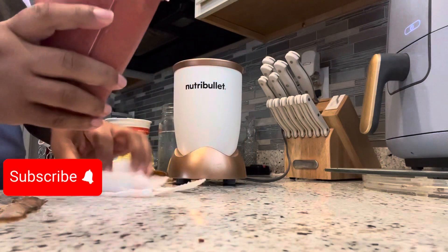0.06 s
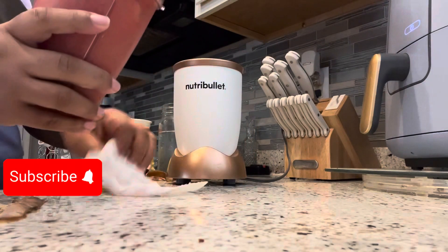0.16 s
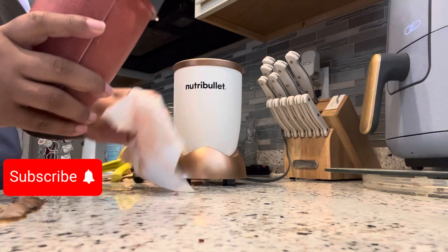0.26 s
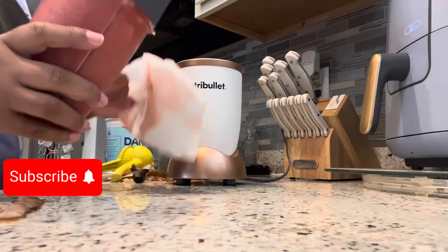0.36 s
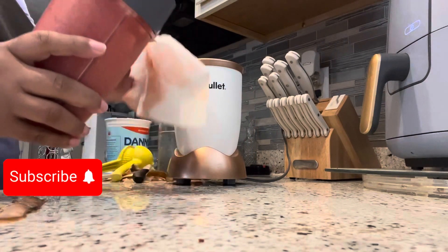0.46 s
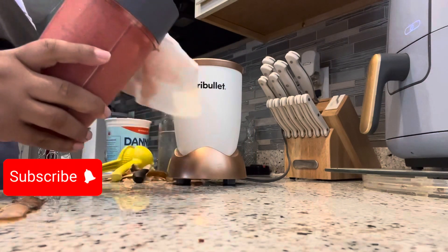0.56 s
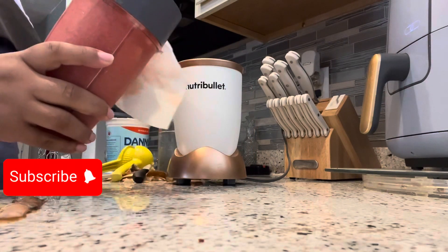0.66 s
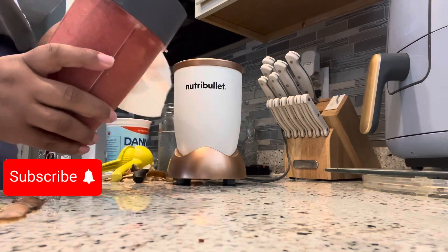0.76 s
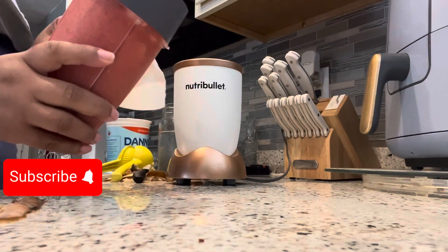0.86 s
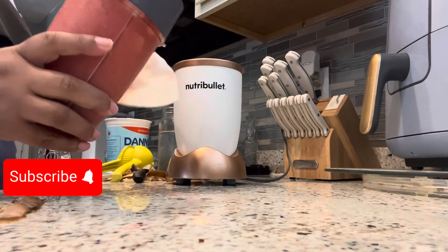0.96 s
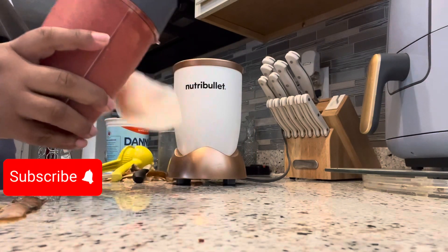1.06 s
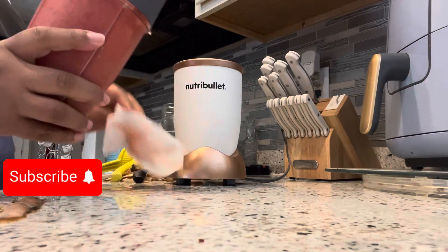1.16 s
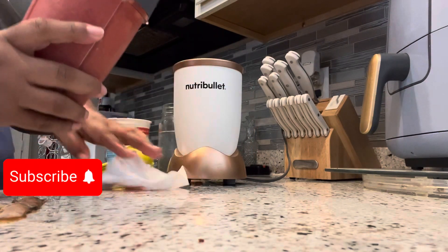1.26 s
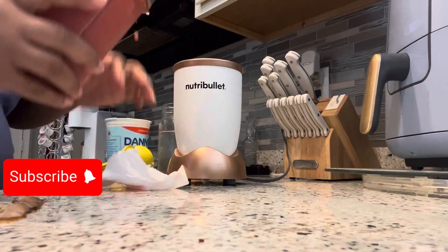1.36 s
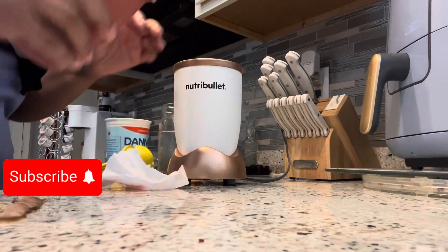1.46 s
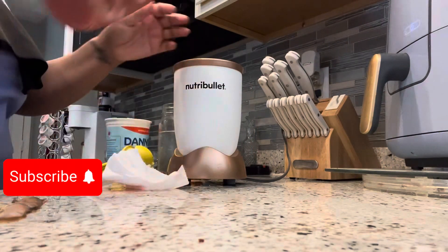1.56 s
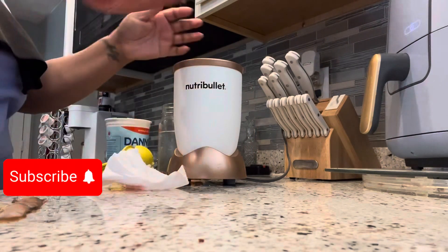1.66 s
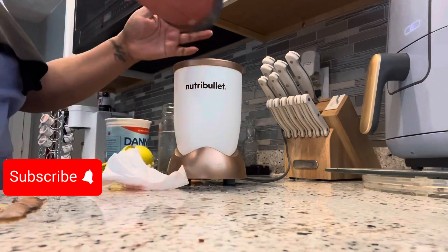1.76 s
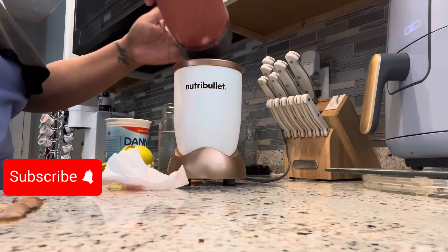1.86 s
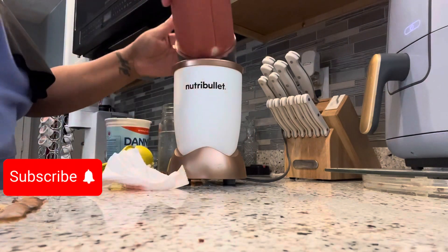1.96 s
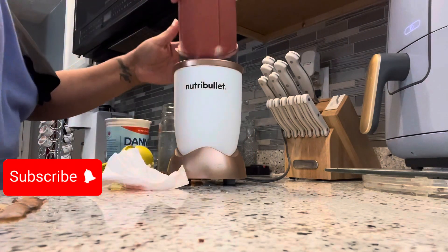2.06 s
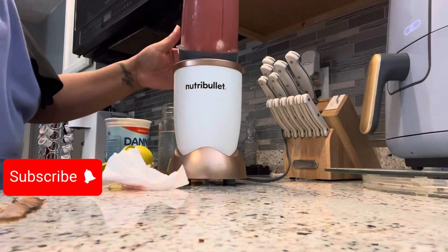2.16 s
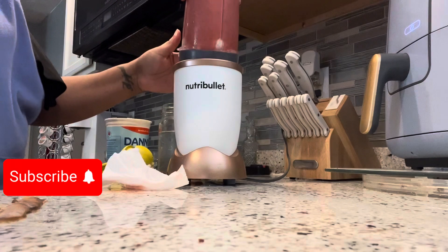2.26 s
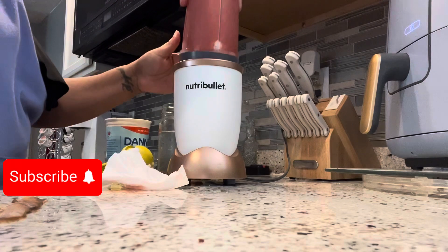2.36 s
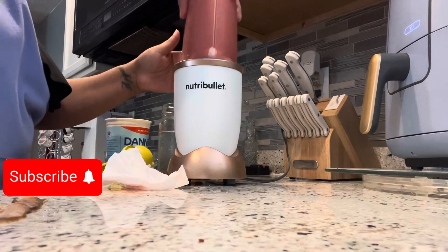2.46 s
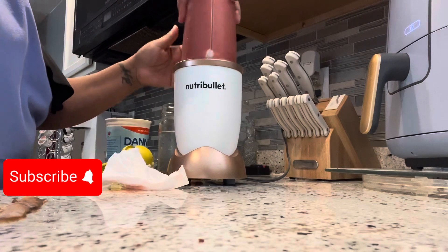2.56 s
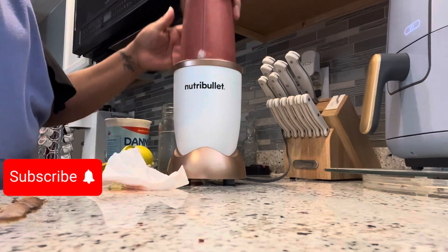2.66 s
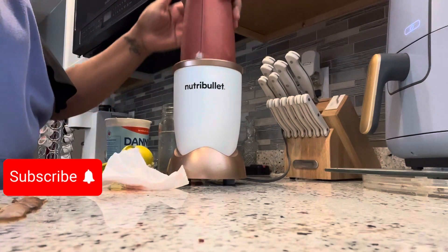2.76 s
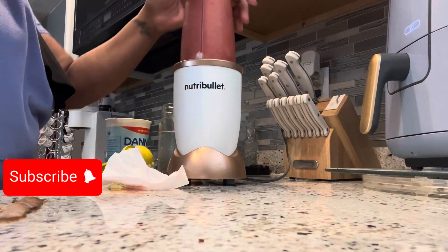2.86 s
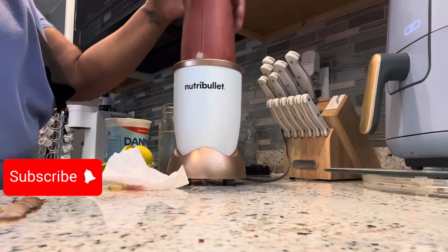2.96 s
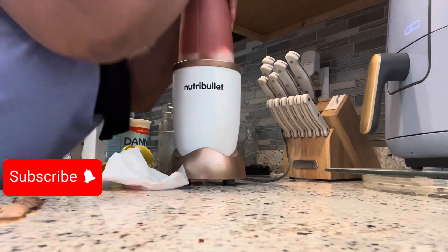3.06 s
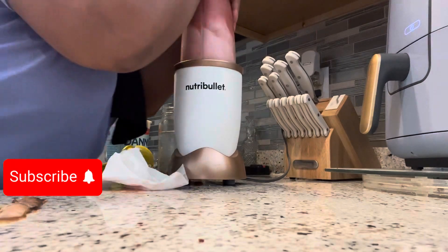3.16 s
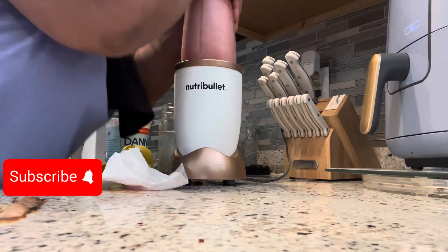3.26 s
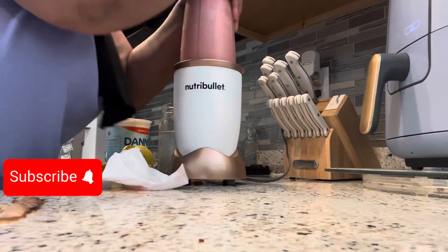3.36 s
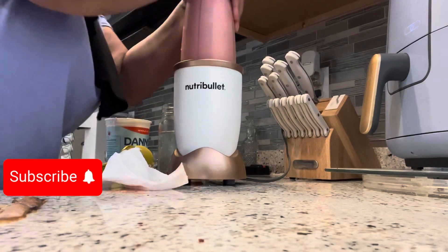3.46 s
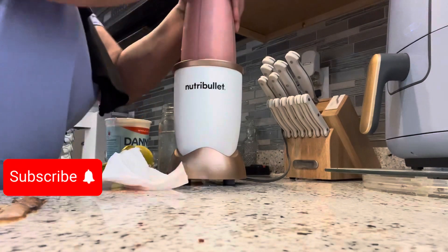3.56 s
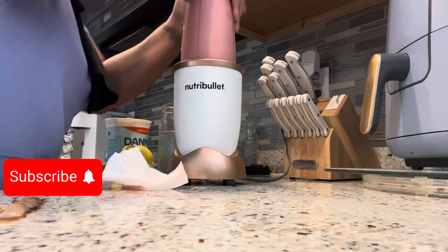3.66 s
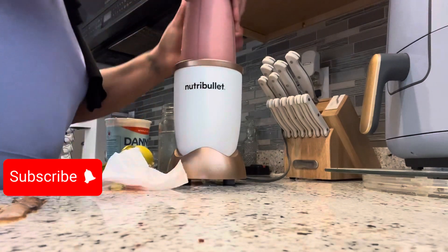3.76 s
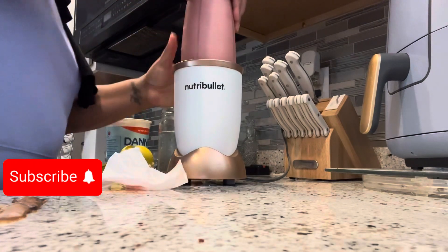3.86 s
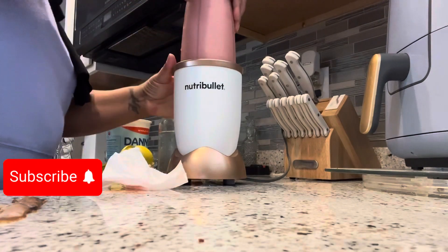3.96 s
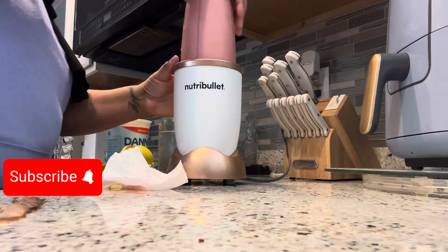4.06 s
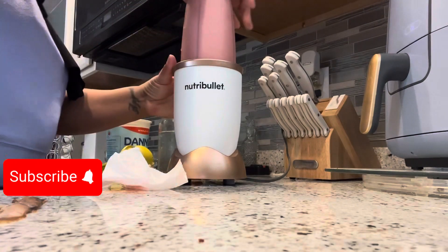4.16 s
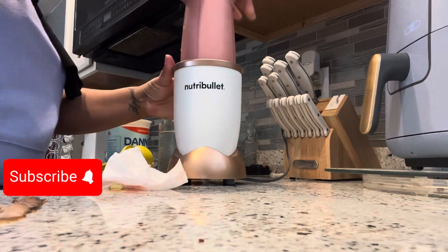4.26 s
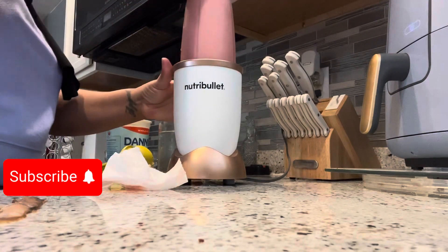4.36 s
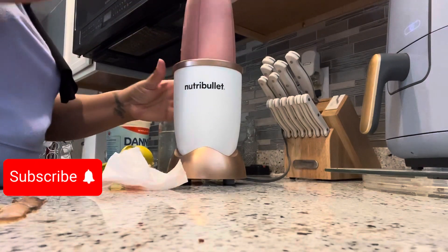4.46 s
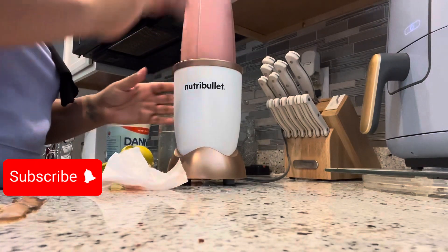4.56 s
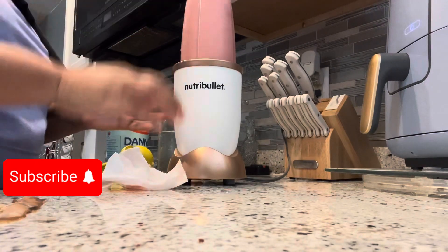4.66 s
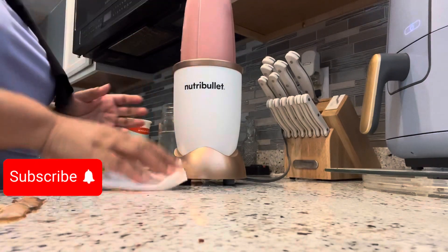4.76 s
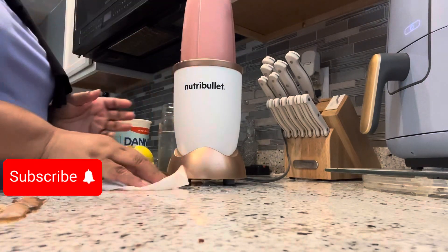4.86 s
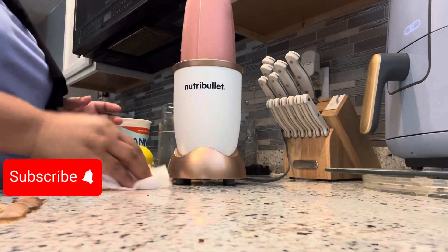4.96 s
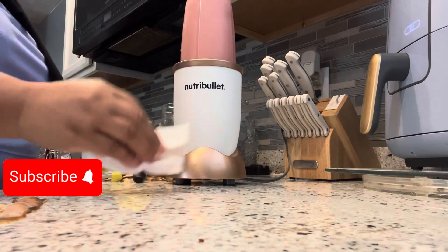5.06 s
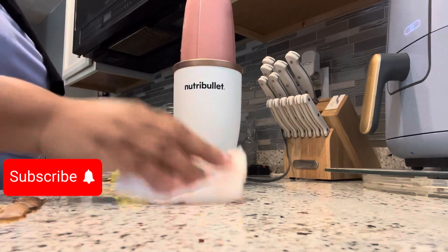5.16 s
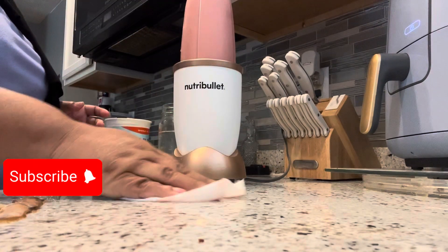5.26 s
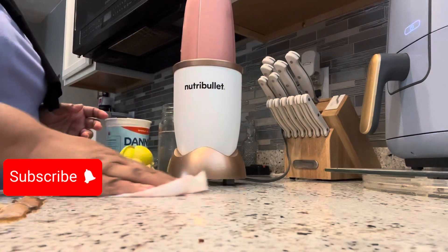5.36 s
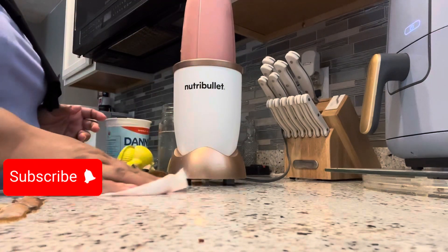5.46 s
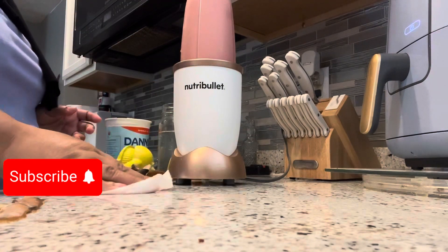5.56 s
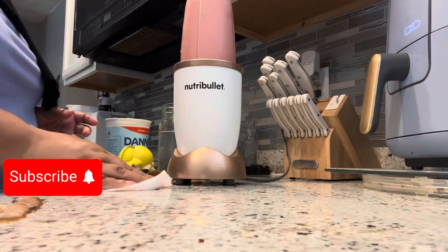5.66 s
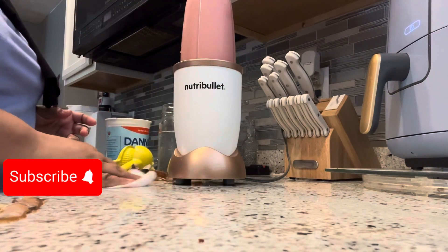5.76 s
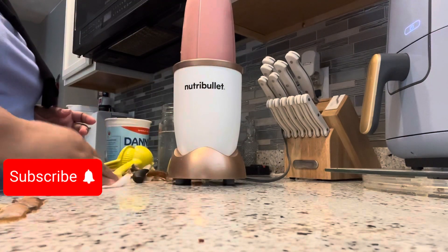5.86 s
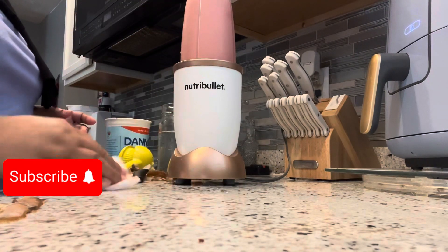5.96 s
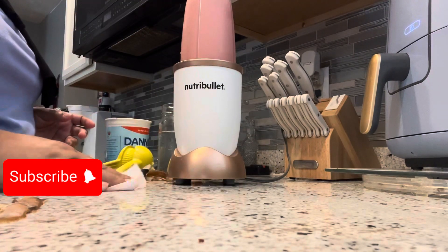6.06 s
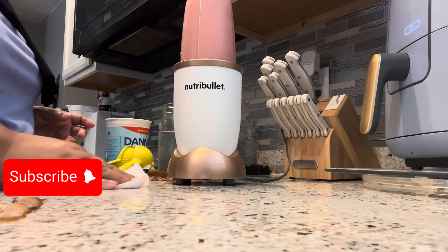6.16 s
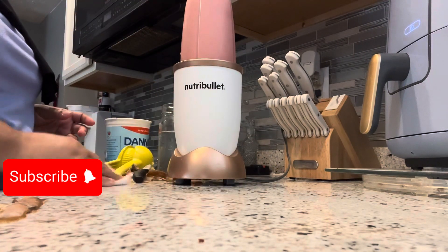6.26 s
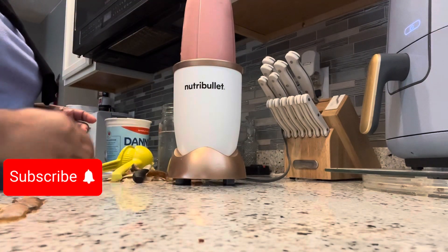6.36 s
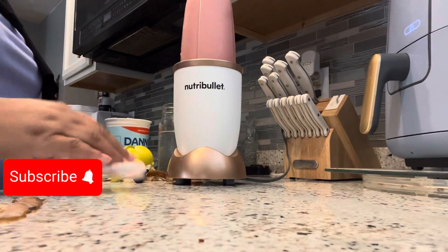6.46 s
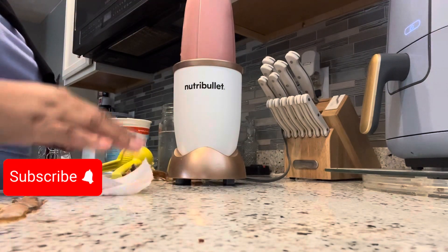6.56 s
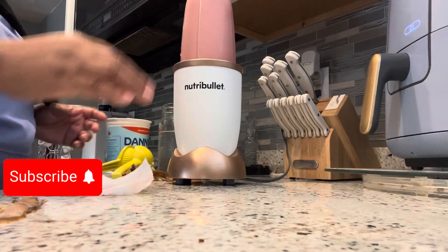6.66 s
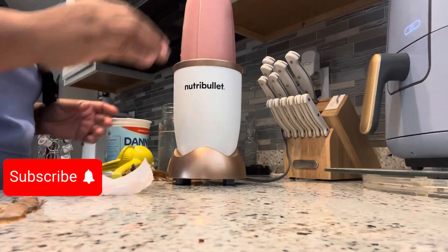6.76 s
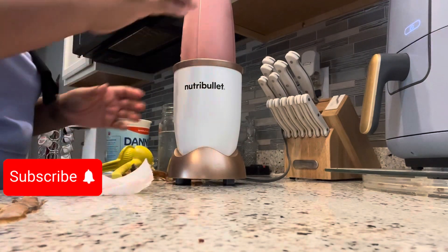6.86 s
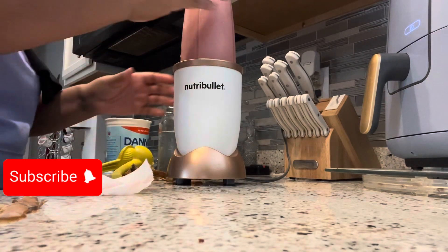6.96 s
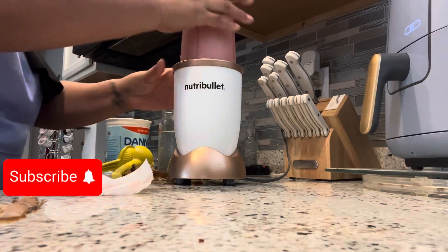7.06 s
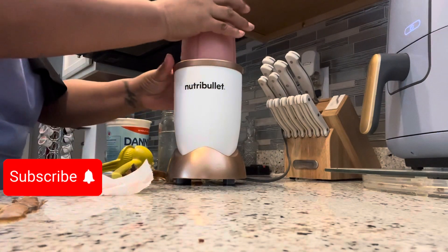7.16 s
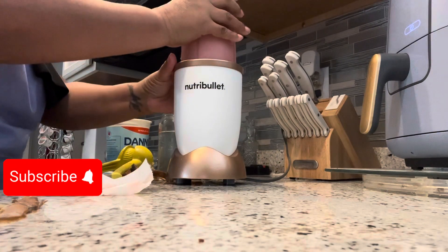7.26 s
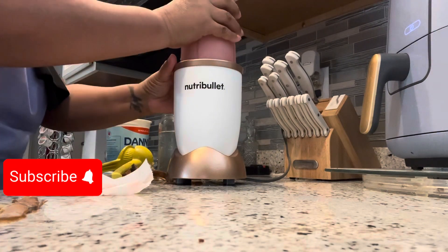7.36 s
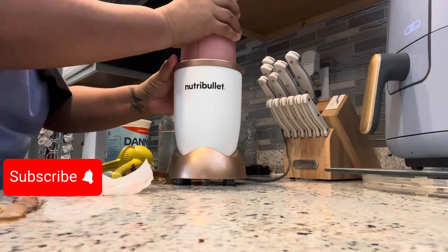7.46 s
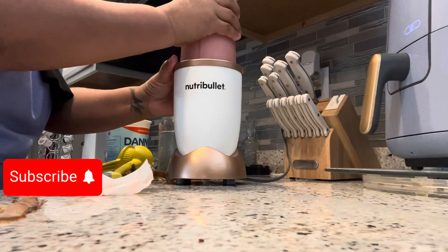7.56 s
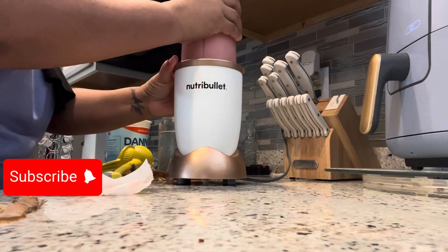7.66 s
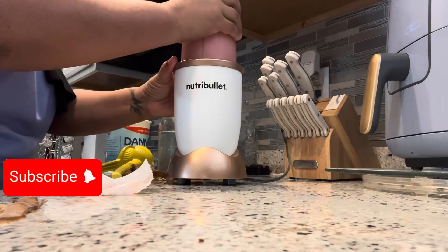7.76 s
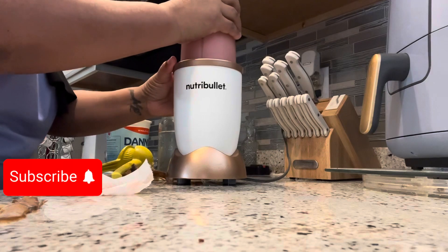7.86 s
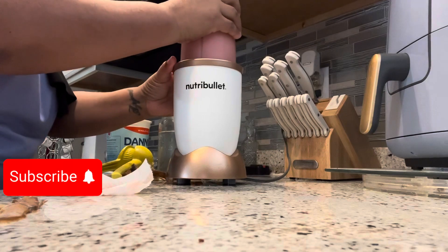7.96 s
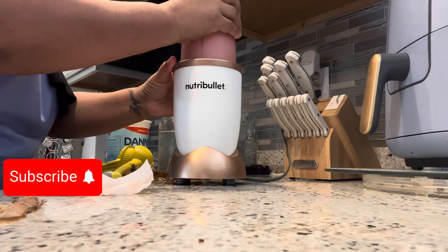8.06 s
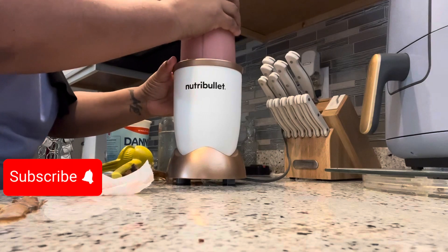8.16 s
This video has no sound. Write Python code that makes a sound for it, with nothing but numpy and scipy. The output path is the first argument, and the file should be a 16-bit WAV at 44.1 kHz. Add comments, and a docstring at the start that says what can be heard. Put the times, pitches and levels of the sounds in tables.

```python
"""A small blender churns fruit on a stone kitchen counter, close to a two-port microphone on the same counter.
Shaped noise makes the liquid, random hits on decaying sines the fruit in the cup, wavering sines the motor.
Before that, paper rustles and the cup is knocked into the base: struck modes and short noise bursts.
A fridge hums on wavering sines behind it all, over a bed of room air.
The recorder lifts the quiet opening and drops that lift for good once the motor is loud."""
import sys
import numpy as np
from scipy import signal
from scipy.fft import rfft, irfft, next_fast_len
from scipy.io import wavfile
from scipy.ndimage import uniform_filter1d, minimum_filter1d

SR = 44100
rng = np.random.default_rng(int(sys.argv[2]) if len(sys.argv) > 2 else 0)


def digitize_waveform(pressure):
    """Quantize a signal to 16-bit integers and store it at the path in sys.argv[1].

    Rows of a 2-D input are taken as channels; values are limited to [-1, 1].
    """
    field = np.atleast_2d(pressure).T
    bounded = np.clip(field, -1, 1)
    quanta = np.round(bounded * 32767).astype(np.int16)
    wavfile.write(sys.argv[1], SR, quanta)


N = 362943

# Levels in the tables are those ahead of the trims, port response and recorder gain that follow.
# whipped liquid, smooth spectrum: [f/Hz, level per Hz/dB]
LIQUID = [(60, -50), (150, -26), (300, -13), (700, 1), (1050, 7), (1350, -2.5), (1750, 1), (2600, -5),
          (2950, -3.5), (3400, -5), (3800, -7.5), (4300, -11), (5500, -20), (7000, -28)]
# ringing modes of the cup, lower part to neck: [f/Hz, level/dB, t60/s]
CUP_MODES = [(108.5, -22.5, 0.096), (176, -19, 0.049), (272, -8, 0.029), (380.3, 0.5, 0.063),
             (424.2, 6, 0.051), (461.2, 3, 0.054), (521.7, -8.5, 0.078), (579.7, -5.5, 0.085)]
# large pieces strike the cup: [loudest at t/s, belly peak level/dB, neck peak level/dB]
STRIKES = [(3.036, -32, -40.5), (3.063, -23.5, -37), (3.085, -38, -48), (3.104, -33, -52),
           (3.116, -27, -53), (3.128, -17.5, -48), (3.145, -24, -40), (3.168, -18.5, -32),
           (3.185, -25, -28), (3.205, -24, -23.5), (3.225, -16, -30), (3.244, -12.5, -25),
           (3.26, -9.5, -25), (3.28, -11, -21), (3.293, -8, -15), (3.312, -12, -32), (3.344, -12, -38),
           (3.397, -9, -29), (3.412, -6.5, -24), (3.435, -11, -29), (3.454, -11, -28), (3.48, -11, -36),
           (3.506, -15.5, -39), (3.559, -11, -31), (3.577, -11, -44), (3.618, -13, -30), (3.644, -21, -36),
           (3.657, -13.5, -36), (3.688, -15, -30), (3.732, -10.5, -31), (3.787, -14, -29),
           (3.834, -13, -36), (3.913, -10.5, -29), (3.963, -23, -20), (3.979, -10.5, -36),
           (4.013, -19, -31), (4.08, -14.5, -15), (4.11, -16, -38), (4.157, -16, -34), (4.185, -17, -26),
           (4.208, -9, -27), (4.277, -16.5, -18.5), (4.324, -16.5, -34), (4.355, -14, -42),
           (4.402, -22, -19.5), (4.511, -16, -12.5), (4.6, -21, -22), (4.66, -18, -15.5),
           (4.69, -14.5, -21), (4.722, -14.5, -36), (4.748, -19.5, -27), (4.807, -15, -16),
           (4.845, -15, -17), (4.874, -14, -18), (4.947, -12, -17.5), (4.968, -14.5, -24),
           (5.034, -20.5, -16), (5.084, -12, -44), (5.111, -16, -39), (5.206, -25, -16.5), (5.45, -41, -31),
           (5.775, -12, -17), (6.12, -12, -16.5), (6.372, -13.5, -31), (6.459, -41, -13.5),
           (6.684, -19, -24), (6.724, -30, -13.5), (7.363, -23, -20), (7.464, -16.5, -30),
           (8.045, -42, -44), (8.07, -47, -46), (8.11, -34, -40), (8.145, -44, -52), (8.173, -36.5, -53),
           (8.196, -46, -58), (8.212, -46, -63)]

# switched on; blade runs free; a hand grips the cup; switched off
ON_S, FREE_S, PRESS_S, OFF_S = 3.0, 5.19, 7.58, 8.0
MAINS_HZ = 120.9  # the mains buzz and torque throb
QUIET_DB, LIFT_DB = -20, 20  # level of the small sounds; what the recorder adds to them


def churn():
    """Blades whip the liquid: a roar and a fizz, throbbing with the mains torque."""
    # the liquid: [t/s, churn level/dB, treble level/dB]
    blend = [(3.0, -58, -20), (3.03, -50, -10), (3.1, -46.5, -9), (3.165, -39.5, -11.5), (3.19, -41.5, -13),
             (3.33, -37.5, -12), (3.41, -31.5, -14.5), (3.6, -31.5, -10), (4.3, -33.5, -9),
             (5.2, -35, -6.5), (6.2, -31.5, -8), (7.1, -30.5, -8), (7.965, -32.5, -7), (8.0, -35.5, -11),
             (8.02, -41.5, -5.5), (8.11, -50.5, -7.5), (8.14, -58.5, -4), (8.23, -74, 7)]
    # the roar's colour moves up as the fruit thins: [t/s, level near 1, 2 and 3.5 kHz/dB]
    tint = [(3.0, -5, -4, -7.5), (3.6, 0, -2.3, -1.5), (4.0, -1.1, -0.7, -0.5), (4.5, 1.5, 0.2, 0.8),
            (5.3, 0.7, 1, 4), (5.6, 1.3, 1, 4), (6.1, 0.5, 1, 0.5), (6.9, -2, -0.8, 0),
            (7.05, -1.5, 2, 2.5), (7.6, -2, 3.5, 2), (8.0, 0, 3.5, 1.5)]
    # resonances of the cup walls: [f/Hz, width/Hz, level/dB]
    wall_peaks = [(1136, 53, -1), (1453, 76, 6), (1733, 55, 5), (2370, 81, 3), (3486, 120, 6)]
    # treble spray: [f/Hz, level per Hz/dB]
    spray = [(4000, 1.5), (5500, 0), (7000, -2.5), (9000, -12), (12000, -16.5), (13500, -33), (15000, -26)]
    level_db, treble_db = curves(blend)
    throb = 1 + 0.018 * np.sin(2 * np.pi * MAINS_HZ * np.arange(N) / SR)
    roar = noise(LIQUID, patchy_db=1.35, peaks=wall_peaks)
    bands_hz = [650, 1400], [1500, 2400], [3100, 5400]
    for db, band in zip(curves(tint), bands_hz):
        sos = signal.butter(2, band, "band", fs=SR, output="sos")
        roar = roar + (gain_of(db) - 1) * signal.sosfiltfilt(sos, roar)
    fizz = gain_of(treble_db + 1.5) * noise(spray, patchy_db=2.0)
    envelope = gain_of(level_db + 2.5 + 0.41 * wander(30)) * (after(ON_S) > 0)
    return (roar + fizz) * envelope * throb


def lumps():
    """Pieces of fruit patter on the cup, each stirring its modes by chance amounts."""
    # patter on the cup's belly: [t/s, level/dB]
    belly_rows = [(3.0, -45), (3.03, -34.5), (3.07, -36.5), (3.15, -27.5), (3.3, -19), (3.4, -22),
                  (3.9, -20.5), (4.3, -27.5), (5.1, -24.5), (5.4, -25.5), (6.6, -27), (7.6, -29.5),
                  (7.97, -35.5), (8.02, -35), (8.08, -56), (8.13, -54), (8.23, -68)]
    # base rocking: [t/s, level/dB]
    rocking = [(3.001, -46), (3.06, -46), (3.2, -40), (3.5, -35.5), (4.0, -37), (4.2, -40.5), (5.0, -49),
               (8.0, -63), (8.1, -59)]
    # the fruit gets finer: [t/s, hits per second]
    hit_rate = [(3.0, 430), (3.6, 595), (4.2, 1120), (4.998, 2000), (8.2, 2240)]
    belly_db, base_db, rate = (curves(rows)[0] for rows in (belly_rows, rocking, hit_rate))
    neck_db = -31 - 11 * (1 - ramp(ON_S, 0.54)) + 2 * wander(12)  # rises, then holds with a flutter
    neck_db = neck_db - 130 * after(OFF_S) - 6 * ramp(OFF_S, .015)  # fade in dB per s and quick drop
    chance, size = rng.random((2, 2, N))  # separate hits for each of the pair
    strength = gain_of(-2.0 * np.log(size + 0.076)) / np.sqrt(rate)
    hits = (chance < rate / SR) * strength * (after(ON_S) > 0)
    blow = np.hanning(60)  # contact lasts over a millisecond
    shares = rng.standard_normal((len(CUP_MODES), N))
    modes = []
    for share, ring in zip(shares, rings(CUP_MODES, 0.0052)):
        struck = np.convolve(ring, blow)
        modes.append(signal.oaconvolve(hits * share, struck[None])[:, :N])
    base, belly, neck = (evened(sum(part)) for part in (modes[:3], modes[3:6], modes[6:]))
    return base * gain_of(base_db) + belly * gain_of(belly_db) + neck * gain_of(neck_db)


def chunks():
    """Large pieces land softly, ring the cup's belly and neck and throw up a short splash."""
    s, *levels = np.transpose(STRIKES)
    at = np.round(s * SR).astype(int)
    trains = np.zeros((2, N))
    trains[:, at] = gain_of(levels)
    soft = rings(CUP_MODES, rise_s=0.014)
    # neighbouring modes start in opposite directions
    shapes = [-soft[2], soft[3], -soft[4], soft[5]], [soft[6], -soft[7]]
    # each piece lands on another spot and favours other modes
    spot = np.ones((2, 4, N))
    spot[..., at] = gain_of(1.5 * rng.standard_normal((len(s), 2, 4))).transpose(1, 2, 0)
    ringing = np.zeros(N)
    for train, part, gains in zip(trains, shapes, spot):
        whole = abs(sum(part))
        peak, delay = whole.max(), whole.argmax()  # the loudest moment falls on the table's time
        for ring, gain in zip(part, gains):
            ringing += signal.oaconvolve(train * gain, ring / peak)[delay:][:N]
    splash_fade = gain_of(-22.5 - 60 * np.arange(SR // 10) / SR / 0.063)  # t60 0.063 s
    splash = signal.oaconvolve(trains[0], splash_fade)[:N] * noise(LIQUID, patchy_db=6.5)
    return ringing + splash


def motor():
    """Shaft tone, overtones, commutator whine, mains buzz and sidebands; a last faint note of the cup."""
    # motor: [t/s, shaft f/Hz, shaft level/dB, mains buzz level/dB]
    run = [(3.0, 294, -56, -55), (4.0, 338.7, -30, -65), (4.2, 344, -42, -66), (4.33, 347, -39, -43),
           (4.45, 349, -34, -51), (4.6, 351.4, -30, -50), (4.8, 356, -25, -49), (4.87, 357.5, -27, -47),
           (4.98, 358, -22.5, -49.5), (5.28, 359.3, -23, -50.5), (5.42, 361.3, -18.5, -41),
           (5.58, 364.4, -24, -46), (5.66, 365, -17.5, -46), (5.9, 364.4, -18.5, -42.5),
           (6.4, 363.4, -19.5, -38), (6.8, 364.5, -18.5, -44.5), (7.05, 363.7, -19.5, -37.5),
           (7.25, 365.2, -23.5, -37.5), (7.56, 360.6, -19.5, -37.5), (7.95, 361, -19, -39.5),
           (8.0, 357, -19, -45)]
    # shaft overtones: [multiple of the shaft, level/dB]
    overtones = [(3, -44), (4, -47), (8, -48)]
    # a faint wavering note glides down as the last pieces ring the cup:
    # one row [start t/s, length/s, from f/Hz, to f/Hz, level/dB]
    glide = (8.095, .135, 440, 362, -53)
    commutator_bars = 24
    loaded_db, freeing_s = -19, 0.2  # how much lower whine and sidebands are under load; time to change
    labour_rad, labour_db = .45, 2.0  # the loaded motor runs unevenly in phase and level
    grip_s = .03
    second_db, second_gripped_db = -59, -44  # second mains overtone
    hz, shaft_db, buzz_db = curves(run)
    labour = 1 - ramp(FREE_S - freeing_s / 2, freeing_s)
    load_db = loaded_db * labour
    grip = ramp(PRESS_S - grip_s / 2, grip_s)
    shaft = 2 * np.pi * np.cumsum(hz * (1 + 0.00207 * wander(12))) / SR
    mains = 2 * np.pi * MAINS_HZ * np.arange(N) / SR

    # the gripping hand damps the shaft tone and the whine
    level = gain_of(shaft_db - 19 * grip + (1.1 + labour_db * labour) * wander(24))
    tones = level * np.sin(shaft + (.12 + labour_rad * labour) * wander(45))

    level = gain_of(-52.5 + load_db - 7 * grip + 3.5 * wander(40))
    tones += level * np.sin(commutator_bars * shaft + 1.3 * wander(200) + 0.72 * np.sin(mains))

    level = gain_of(buzz_db + (1.2 + labour_db * labour) * wander(14))
    tones += level * np.sin(mains + labour_rad * labour * wander(30))

    level = gain_of(second_db + (second_gripped_db - second_db) * grip + 2.1 * wander(20))
    tones += level * np.sin(2 * mains)

    level = gain_of(1.5 + buzz_db + load_db + 2.5 * wander(8))
    tones += level * (np.sin(shaft + mains) + 0.36 * np.sin(2 * shaft + mains))

    orders = sum(gain_of(db + 1.7 * wander(25)) * np.sin(k * shaft) for k, db in overtones)
    tones += ramp(3.9, freeing_s) * orders  # overtones come up from 3.9 s

    start, length, from_hz, to_hz, db = glide
    u = ramp(start, length)
    swell = gain_of(db) * np.sqrt(abs(np.sin(np.pi * u)))
    glide_hz = from_hz + (to_hz - from_hz) * u + 22 * wander(80)  # wavers in pitch
    ring_glide = swell * gain_of(5 * wander(200)) * np.sin(2 * np.pi * np.cumsum(glide_hz) / SR)
    powered = gain_of(-500 * after(OFF_S)) * (after(ON_S) > 0)  # dies at 500 dB per s
    return np.sqrt(2) * (tones * powered + ring_glide)


def knocks():
    """Cup meets base: each knock rings the cup, thuds the base, clacks and ticks with decaying noise."""
    # cup meets base: [t/s, ring, low thud, high thud, clack and tick level/dB]
    impacts = [(1.196, -54, -57, -57, -55, -57), (1.981, -24, -24, -26, -33.5, -42),
               (2.032, -20, -38, -28, -41, -56), (2.051, -25, -29, -28, -48, -50),
               (2.061, -28, -29, -29, -47, -64), (2.077, -34, -29, -23, -64, -66),
               (2.146, -27, -27, -23, -39, -45.5), (2.238, -33, -46, -46, -52, -68),
               (2.285, -36, -50, -50, -58, -70), (2.296, -42, -50, -50, -57, -68),
               (2.331, -36, -46, -39, -47.5, -37.5), (2.454, -38, -50, -50, -48, -45),
               (2.461, -7, -20.5, -10, -35.5, -50), (2.522, -43, -41, -32, -49, -75),
               (2.551, -25.5, -38, -38, -70, -77), (2.607, -16, -26, -43, -49, -50),
               (2.68, -23, -46, -48, -63, -65), (2.694, -8, -35, -37, -29.5, -44),
               (2.705, 0.5, -8.5, -11, -60, -44.5), (2.717, -4.5, -40, -30, -68, -53),
               (2.727, -15, -29, -37, -55, -55), (2.751, -20, -37, -35, -67, -62),
               (2.789, -24, -28, -38, -69, -72), (2.959, -41, -70, -70, -53, -63),
               (2.975, -23, -41, -41, -62, -72)]
    # modes of the base on the counter: [f/Hz, level/dB, t60/s]
    base_modes = [(62.1, -14.5, 0.36), (85, -27, 0.17), (104, 2.5, 0.099), (123, -15, 0.14),
                  (164, -4, 0.11), (251, -0.5, 0.061)]
    # spectra of clack and tick: [f/Hz, level per Hz/dB]
    clack_colour = [(200, 11.5), (450, 16), (900, 5), (1500, -1.5), (2500, -9.5), (4000, -11.5),
                    (7000, -32)]
    tick_colour = [(2500, -7), (4500, 3), (7000, 2), (10000, -2), (13000, -5), (15000, -1)]
    # parts of the clack's and the tick's decay: [level/dB, t60/s]
    clack_parts = [(9.5, 0.093), (2, 0.048), (-13.5, 0.72)]
    tick_parts = [(7, .028), (-4, .08)]
    s, *levels = np.transpose(impacts)
    trains = np.zeros((5, N))
    trains[:, np.round(s * SR).astype(int)] = gain_of(levels)
    ring_hits, low_hits, high_hits, clack_hits, tick_hits = trains

    t = np.arange(SR // 2) / SR
    clack_fade, tick_fade = (sum(gain_of(db - 60 * t / t60) for db, t60 in parts)
                             for parts in (clack_parts, tick_parts))
    clack = signal.oaconvolve(clack_hits, clack_fade)[:N] * noise(clack_colour, patchy_db=1.0)
    tick = signal.oaconvolve(tick_hits, tick_fade)[:N] * noise(tick_colour, patchy_db=1.0)

    blow = np.hanning(60) / 26
    loose = after(2.2) == 0  # the cup rings higher until it sits in the socket
    ring = np.zeros(N)
    for when, pitch in ((loose, 1.14), (~loose, 1)):
        held = [(hz * pitch, db, t60 * 0.65) for hz, db, t60 in CUP_MODES[2:6]]  # hands damp the cup
        struck = np.convolve(sum(rings(held, 0.0066)), blow)
        ring += gain_of(1.5) * signal.oaconvolve(ring_hits * when, struck)[:N]

    thud = np.zeros(N)
    for hits, modes in ((low_hits, base_modes[:4]), (high_hits, base_modes[4:])):
        thud += gain_of(4.0) * signal.oaconvolve(hits, sum(rings(modes, 0.018)))[:N]
    return clack + tick + ring + thud


def rustle():
    """Paper handled and the cup rubbing its socket: noise that rises fast and fades at its own rate."""
    # paper towel handled: [start t/s, length/s, level/dB, fade/dB per s]
    handling = [(0.056, 0.047, -47, 75), (0.443, 0.0088, -67, 288), (0.53, 0.3, -60, 300),
                (0.898, .005, -58, 300), (0.98, .02, -68, 90), (1.124, 0.049, -68, 303),
                (1.203, .005, -57, 296), (1.913, .005, -61, 601)]
    # cup sliding into its socket: [start t/s, length/s, level/dB, fade/dB per s]
    sliding = [(2.03, .01, -58, 160), (2.302, 0.1, -49, 79), (2.615, 0.026, -56, 185),
               (2.853, 0.036, -79, 903)]
    # spectrum of both: [f/Hz, level per Hz/dB]
    paper_colour = [(800, 4.5), (2000, -2.5), (3500, -4.5), (5000, -5), (9000, -9.5), (13000, -11),
                    (15000, -16)]
    t = np.arange(N) / SR
    rub = gain_of(-95)  # faint rustle between the rubs
    for s, length, db, fade in [*handling, *sliding]:
        onset_db = 330 * np.minimum(t - s, 0)  # 330 dB per s
        rub = rub + gain_of(db + onset_db - fade * after(s + length))
    return rub * gain_of(1.5 * wander(150)) * noise(paper_colour, patchy_db=1.5)


def room_air():
    """Steady noise of the kitchen's air, heaviest in the bass."""
    # spectrum of the air: [f/Hz, level per Hz/dB]
    air_colour = [(30, -14), (60, -5), (120, -5), (200, -4), (300, -8.5), (520, -5.5), (700, -18.5),
                  (850, -13.5), (1500, -24.5), (3000, -33), (6000, -43), (15000, -55)]
    return gain_of(-46.5) * noise(air_colour, patchy_db=1.0)


def fridge():
    """Compressor tones, each wavering in level and phase."""
    # compressor tones: [f/Hz, level/dB]
    compressor = [(58.5, -41), (119, -51.5), (228, -60.5), (308, -60), (522, -63)]
    t = np.arange(N) / SR
    hum = np.zeros(N)
    for hz, db in compressor:
        level = gain_of(db + 1.5 * wander(9.3)) * np.sqrt(2)
        hum += level * np.sin(2 * np.pi * (hz * t + 0.091 * wander(4.3)))
    return hum


def room(pair, t60, wet_db):
    """Adds a tail of sparse taps of random sign, other taps for each of the pair."""
    t = np.arange(SR // 2) / SR
    signs = rng.choice([-1., 1.], (2, len(t)))
    present = rng.random((2, len(t))) < 3000 / SR  # 3000 taps per s
    taps = signs * present * gain_of(-60 * t / t60)
    taps *= gain_of(wet_db) / np.linalg.norm(taps[0])
    return pair + signal.oaconvolve(pair, taps, axes=1)[:, :N]


def ports(pair, nearness):
    """The right port hears the first of a pair; the left a shifted share of it plus the second."""
    # left port against right, ahead of nearness: [f/Hz, level/dB, likeness 0-1, phase ahead/rad]
    left_port = [(60, 0, .97, 0), (130, 0, .9, -.4), (240, -4, .6, -1.3), (310, -15, .9, .7),
                 (440, -19, .9, .7), (490, -15, .5, 1.8), (530, -4, .7, 2.8), (590, -1, .75, 2.0),
                 (750, 0, .3, 2.5), (950, -4, .7, 4.8), (1500, -3, .55, 6.3), (2400, 0, .6, 6.1),
                 (2900, 2, .5, 4.2), (3900, -1, .2, 6.3), (4400, -2, .3, 3.8), (6600, -2, .4, 9.3),
                 (7200, -1, .8, 9.4), (9300, 0, .85, 9.9), (10000, 0, .6, 11.8), (10500, 0, 1, 12.57),
                 (13000, 0, 1, 12.57), (13800, 0, .5, 14.5), (14600, 0, .99, 15.7)]
    size = next_fast_len(N + 4096)
    level_db, same, ahead = read(left_port, np.fft.rfftfreq(size, 1 / SR))
    same = np.clip(same, 0, 1) ** (1 / nearness)
    right, other = rfft(pair, size)
    mixed = same * right + np.sqrt(1 - same ** 2) * other
    left = gain_of(nearness * level_db) * np.exp(1j * ahead) * mixed
    return np.array([irfft(left, size)[:N], pair[0]])


def noise(points, patchy_db, peaks=()):
    """Two unrelated noises of one spectrum with shared drifting patches."""
    hz = np.fft.rfftfreq(1024, 1 / SR)
    a, b, c, d, patches = rng.standard_normal((N // 256 + 5, 513, 5)).T
    patches = uniform_filter1d(patches, size=14, axis=0)  # across frequency
    patches = evened(uniform_filter1d(patches, size=6, axis=1))  # along time
    colour_db = read(points, hz)[0] + sum(db / (1 + (2 * (hz - f) / w) ** 2) for f, w, db in peaks)
    z = np.array([a + 1j * b, c + 1j * d]) * gain_of(colour_db[:, None] + patchy_db * patches)
    return evened(signal.istft(z, nperseg=1024, noverlap=768)[1][:, :N])


def rings(modes, rise_s):
    """One decaying sine a mode, with a soft start."""
    t = np.arange(SR // 4) / SR
    rise = 1 - np.exp(-t / rise_s)
    return [gain_of(db - 60 * t / t60) * rise * np.sin(2 * np.pi * hz * t) for hz, db, t60 in modes]


def wander(rate):
    """Slow random drift of rms 1, made of sines up to rate in Hz."""
    t = np.arange(0, N, 64) / SR
    slow = sum(np.sin(2 * np.pi * (f * t + rng.random())) / np.sqrt(f)
               for f in np.geomspace(rate / 20, rate, num=24))
    return np.interp(np.arange(N) / SR, t, evened(slow))


def gain_of(db):
    """Amplitude factor of a level in dB."""
    return 10 ** (np.asarray(db) / 20)


def evened(x):
    """Scales to rms 1."""
    return x / np.sqrt(np.mean(x ** 2) + 1e-20)


def read(points, hz):
    """Columns of a spectrum table at hz, interpolated over log frequency."""
    f, *values = np.transpose(points)
    return [np.interp(np.log(hz + 1), np.log(f + 1), v) for v in values]


def curves(rows):
    """Columns of a time table at every sample."""
    s, *values = np.transpose(rows)
    return [np.interp(np.arange(N) / SR, s, v) for v in values]


def ramp(start_s, length_s):
    """Rises from 0 to 1."""
    return np.clip((np.arange(N) / SR - start_s) / length_s, 0, 1)


def after(start_s):
    """Seconds since start_s, zero before."""
    return np.maximum(np.arange(N) / SR - start_s, 0)


def scene():
    """The blender is near and coherent between the ports; room air and rustle are more diffuse."""
    roar = room(churn(), t60=.22, wet_db=-10)
    motor_pair = motor() * [[1], [0]]  # one source, nothing unrelated in the second
    seating = gain_of(QUIET_DB) * room(knocks(), t60=0.31, wet_db=-11.0)
    blender = roar + lumps() + chunks() + motor_pair + seating
    kitchen = ports(rustle() + room_air(), nearness=0.46) + fridge()
    return ports(blender, nearness=0.77) + gain_of(QUIET_DB) * kitchen


def record(dry):
    """Bass cut; gain control gives up its lift only under lasting loud sound; soft limit; band limit."""
    dry = signal.sosfilt(signal.butter(4, 45, "high", fs=SR, output="sos"), dry)
    power = uniform_filter1d((dry ** 2).mean(0), size=2000)
    power_db = 10 * np.log10(abs(power) + 1e-12)
    lasting_db = minimum_filter1d(power_db, size=5001, origin=2000)  # ignores single knocks
    over_db = np.clip(lasting_db + 49, 0, LIFT_DB)
    over_db = np.maximum.accumulate(over_db)  # lift once lost stays lost
    keep = np.exp(-1 / (.1 * SR))  # 0.1 s smoothing
    over_db = signal.lfilter([1 - keep], [1, -keep], over_db)
    lifted = dry * gain_of(LIFT_DB - over_db)
    limited = lifted / (1 + (lifted / .95) ** 8) ** .125
    low_pass = signal.firwin(511, 14900, window=("kaiser", 9), fs=SR)
    return signal.oaconvolve(limited, low_pass[None], "same")


dry = scene()
out = record(dry)
digitize_waveform(out)
```